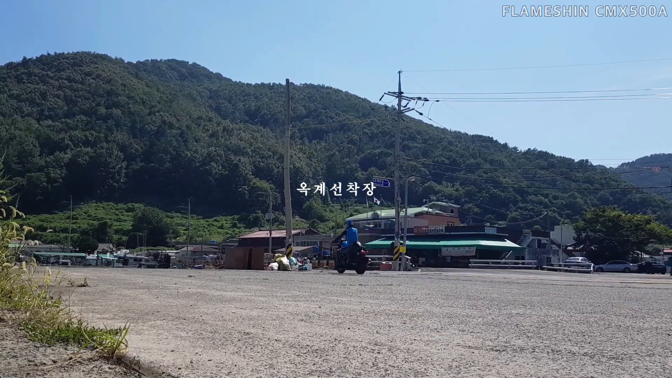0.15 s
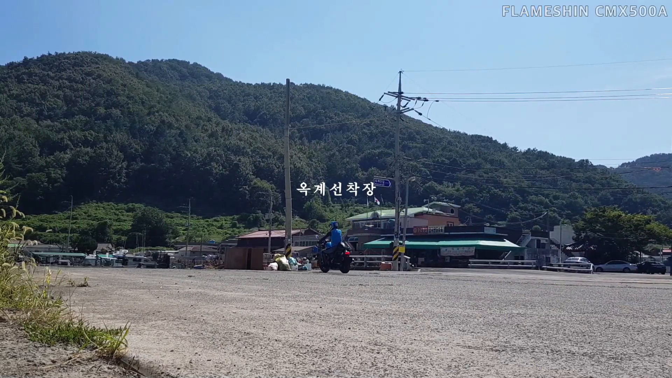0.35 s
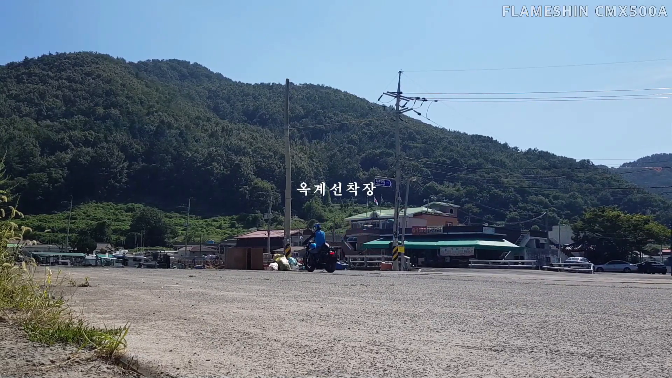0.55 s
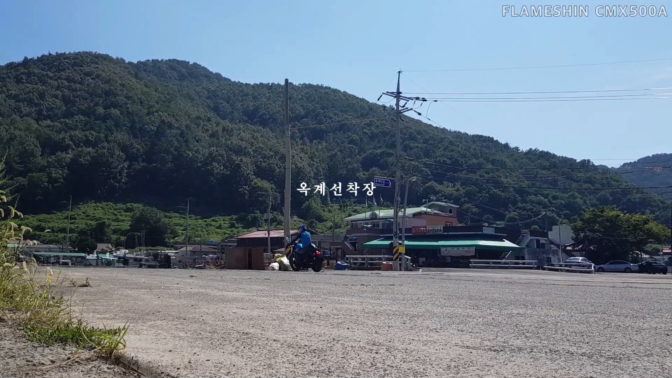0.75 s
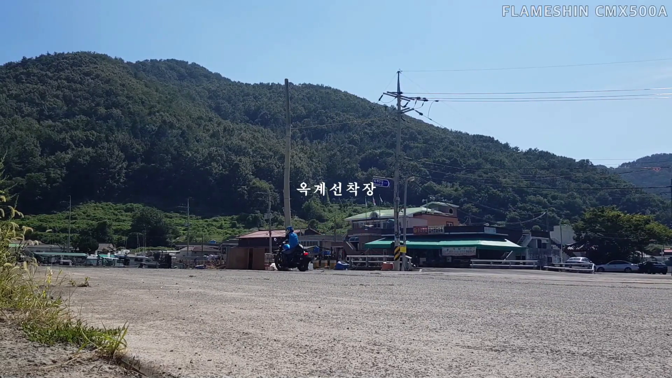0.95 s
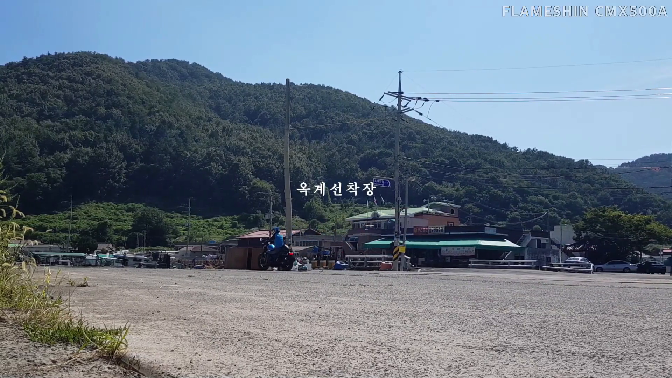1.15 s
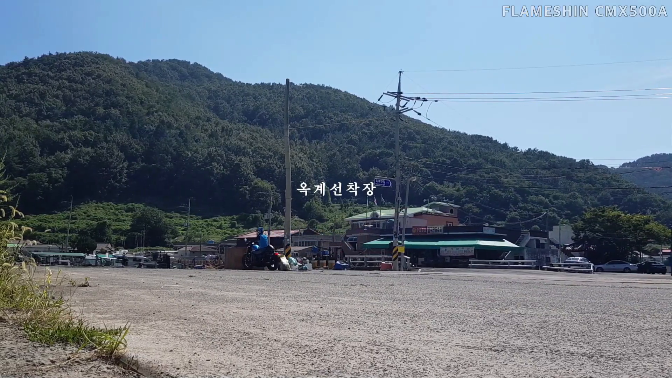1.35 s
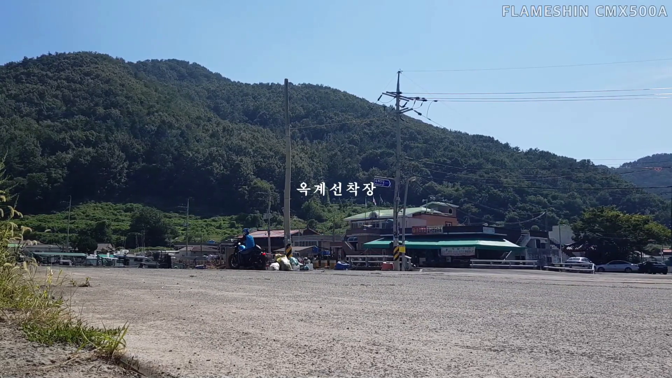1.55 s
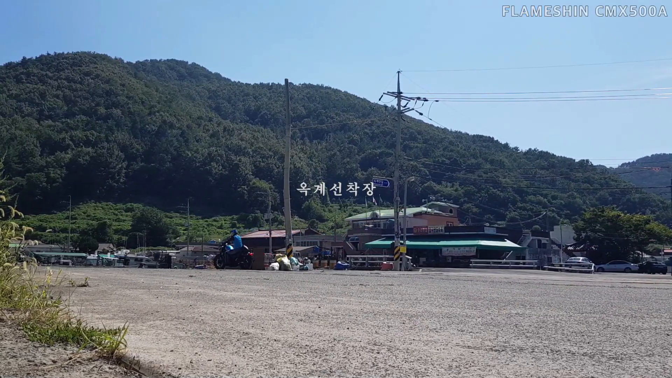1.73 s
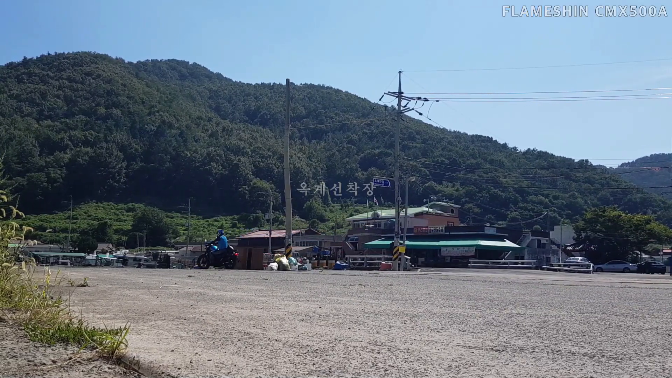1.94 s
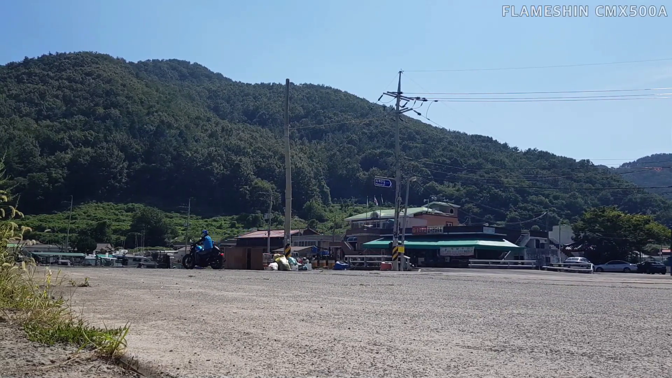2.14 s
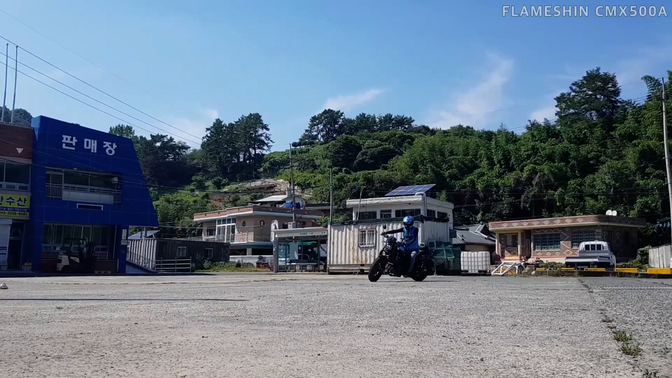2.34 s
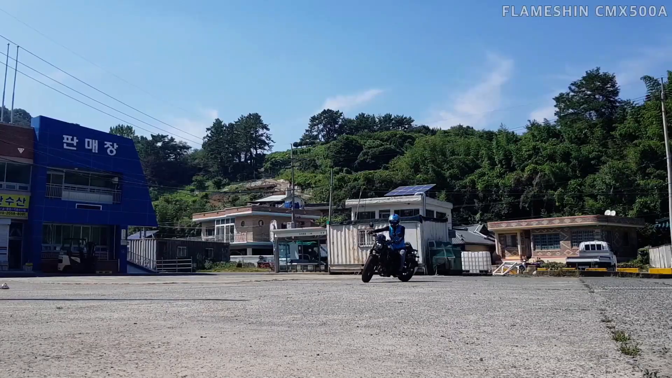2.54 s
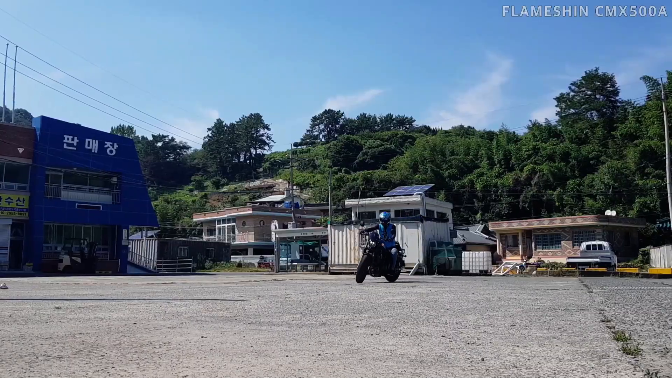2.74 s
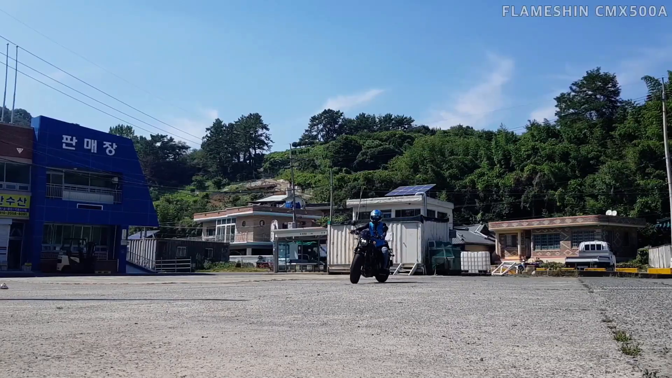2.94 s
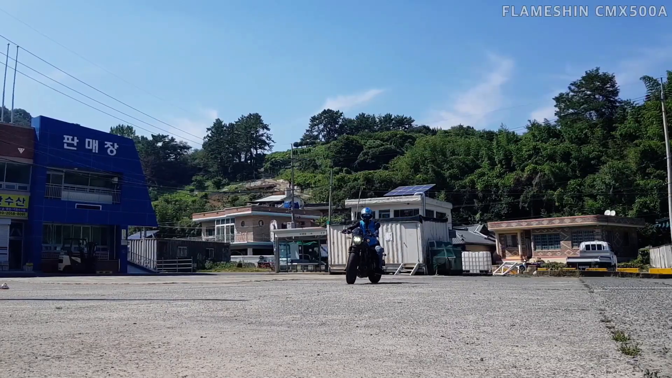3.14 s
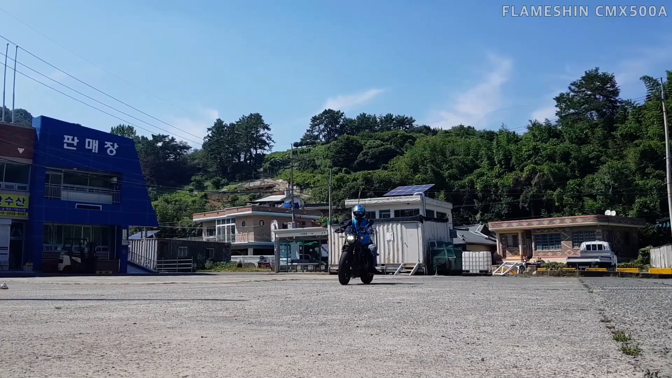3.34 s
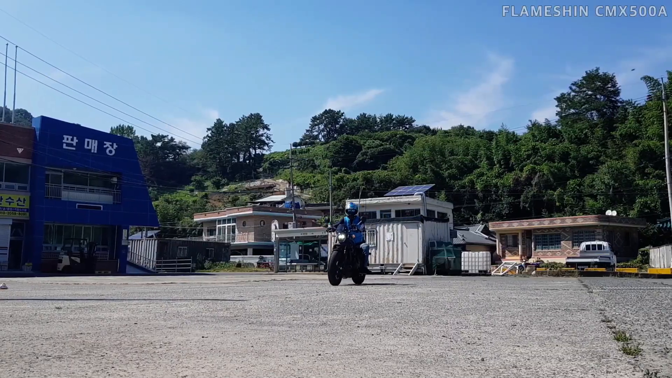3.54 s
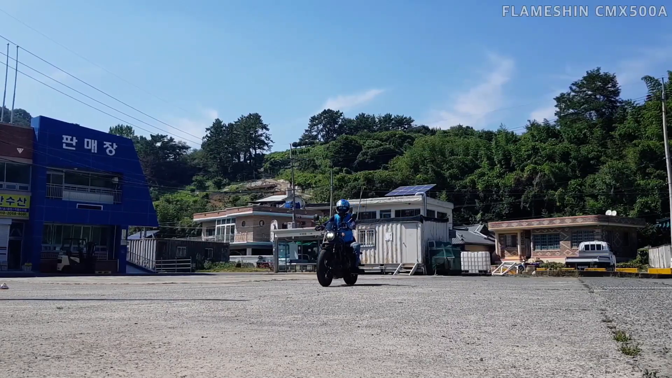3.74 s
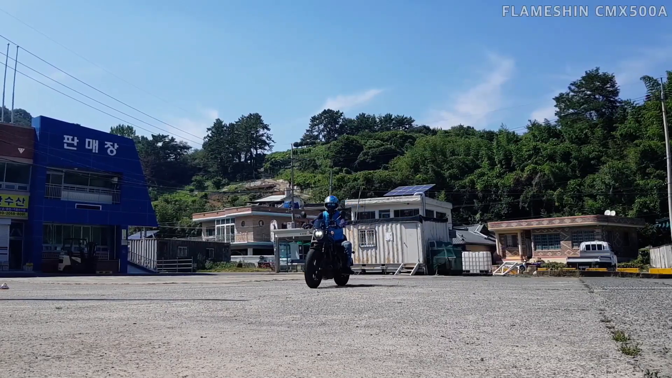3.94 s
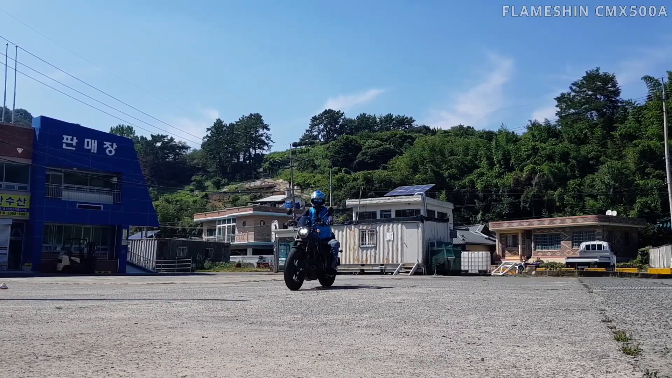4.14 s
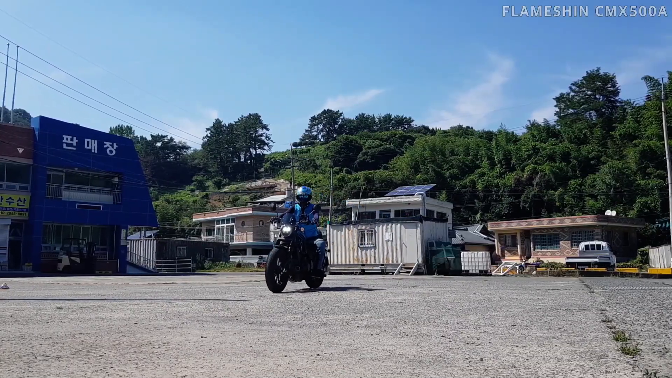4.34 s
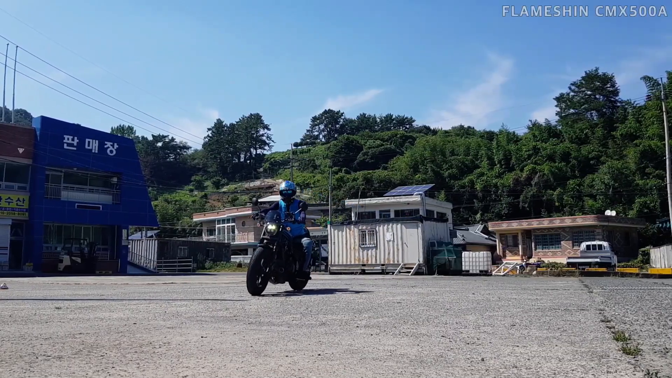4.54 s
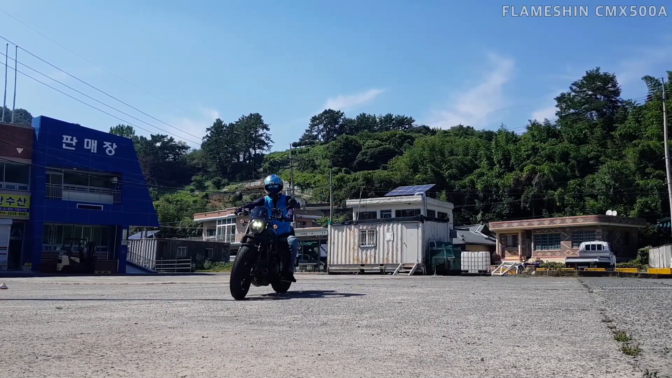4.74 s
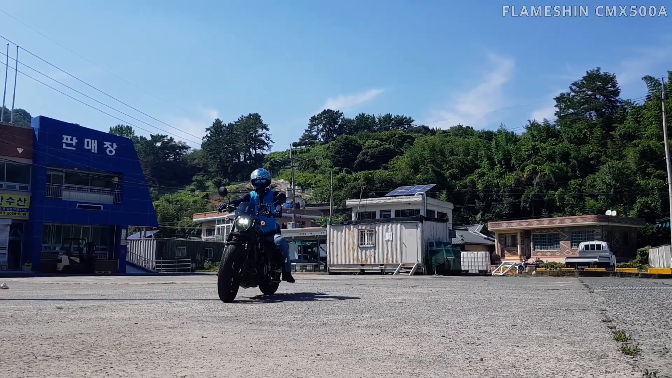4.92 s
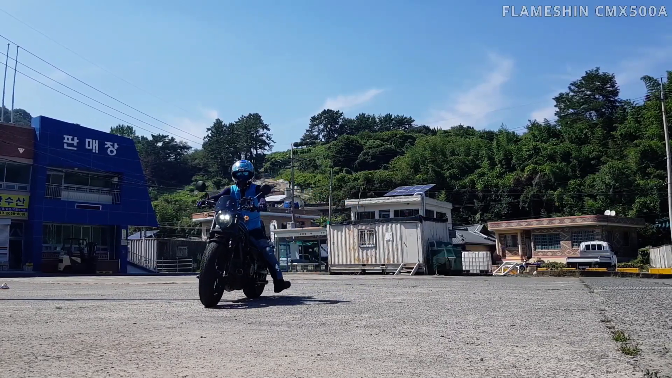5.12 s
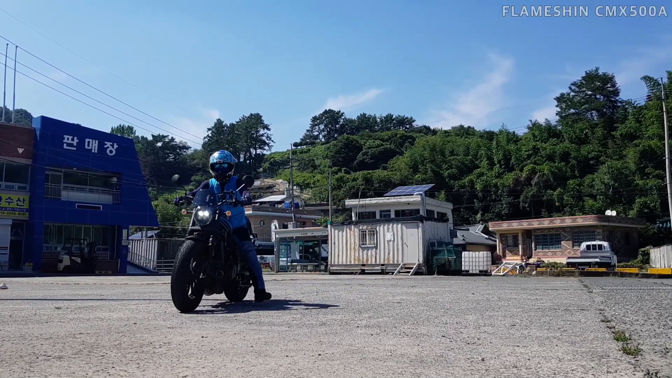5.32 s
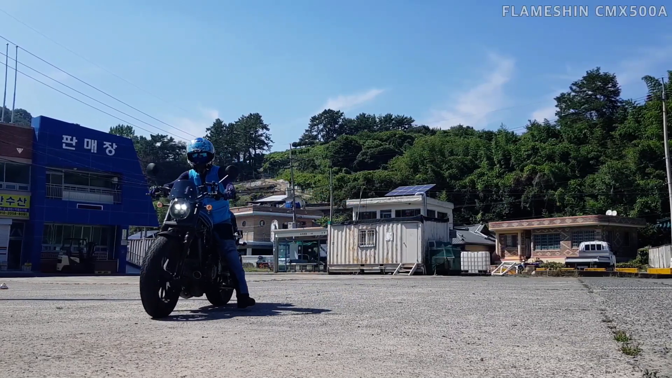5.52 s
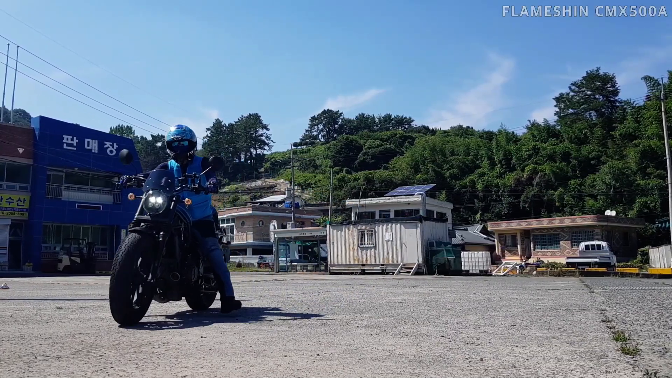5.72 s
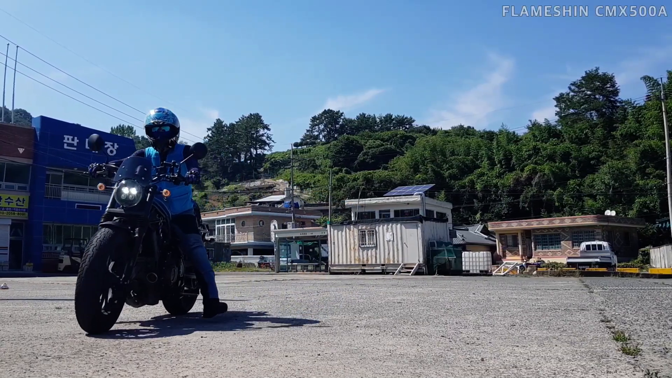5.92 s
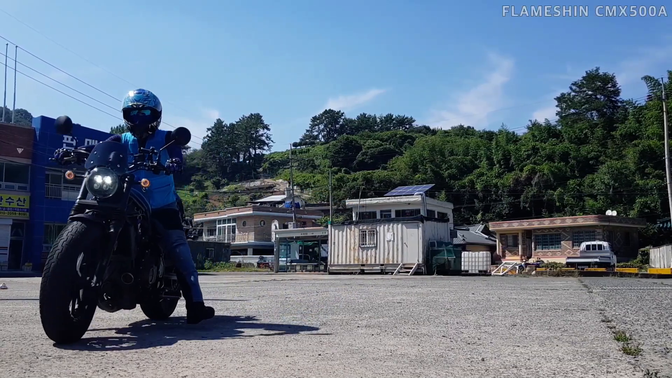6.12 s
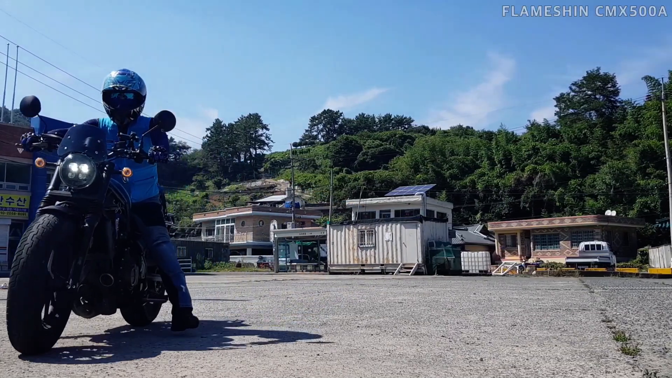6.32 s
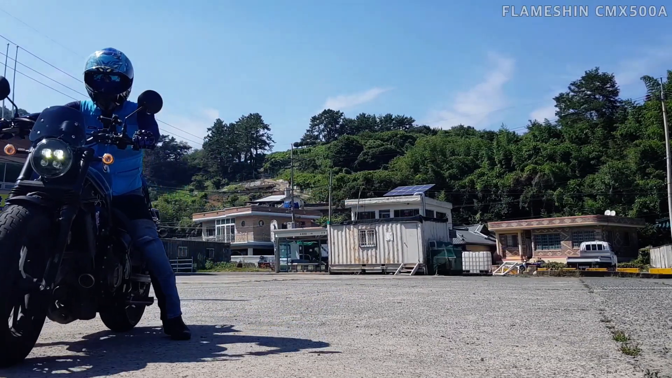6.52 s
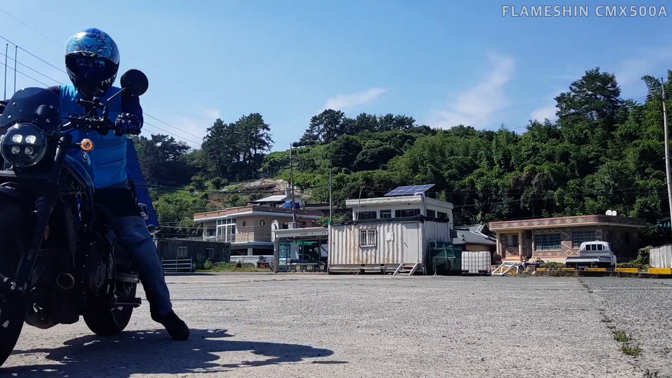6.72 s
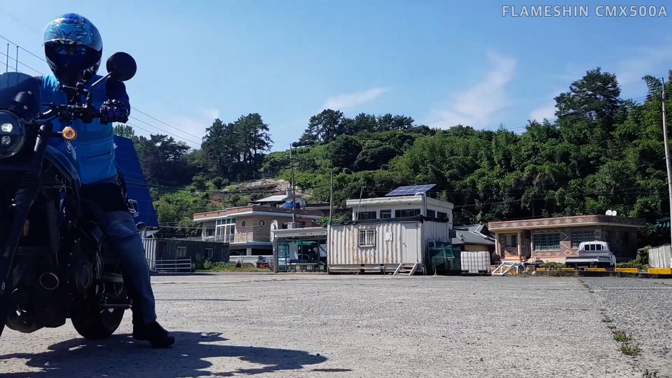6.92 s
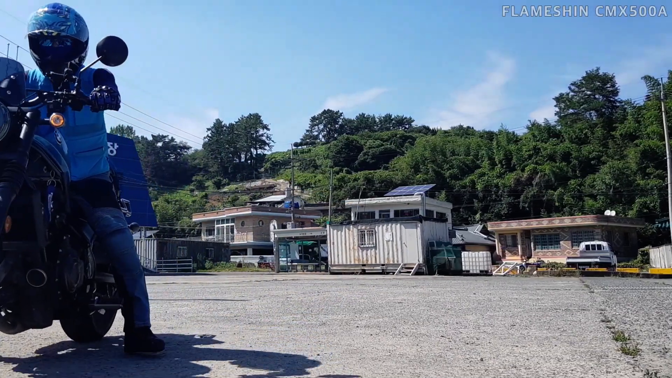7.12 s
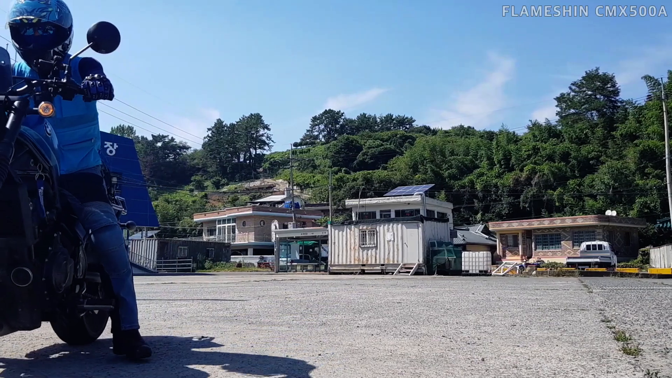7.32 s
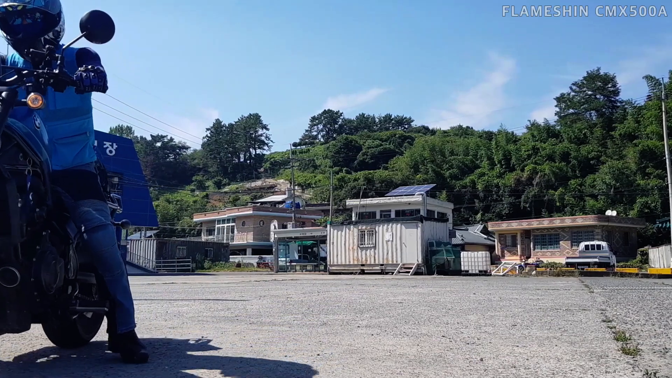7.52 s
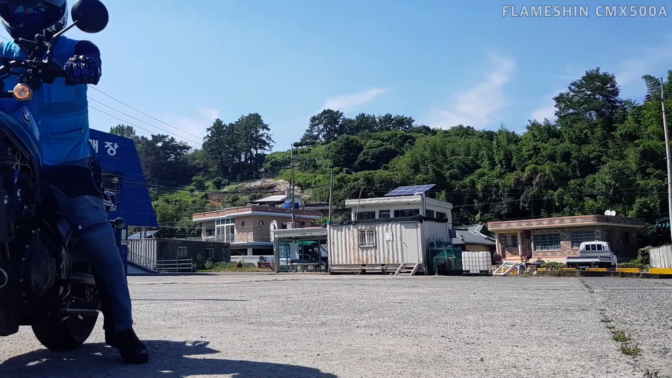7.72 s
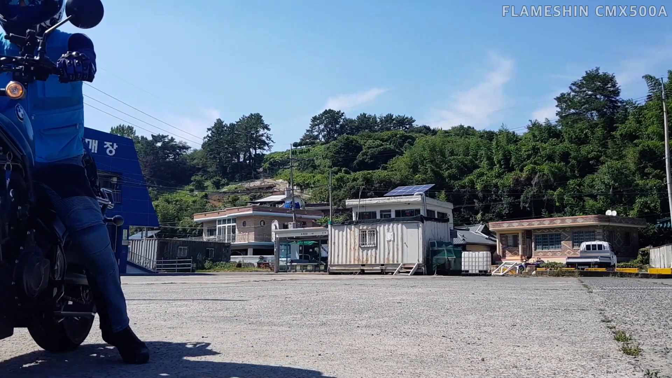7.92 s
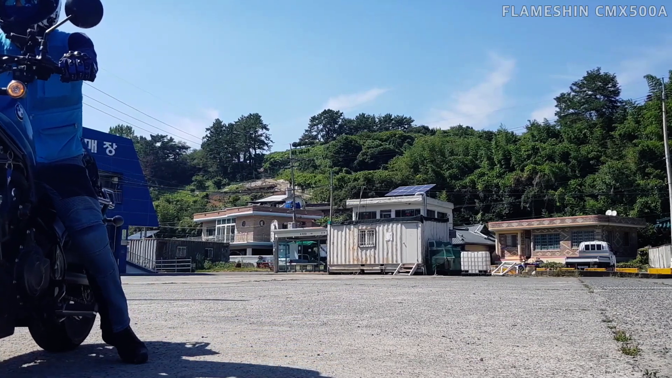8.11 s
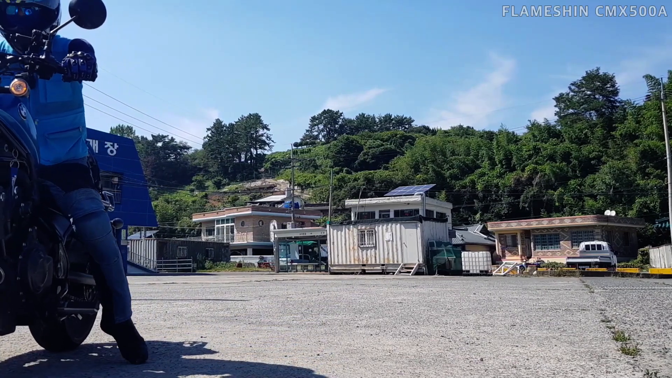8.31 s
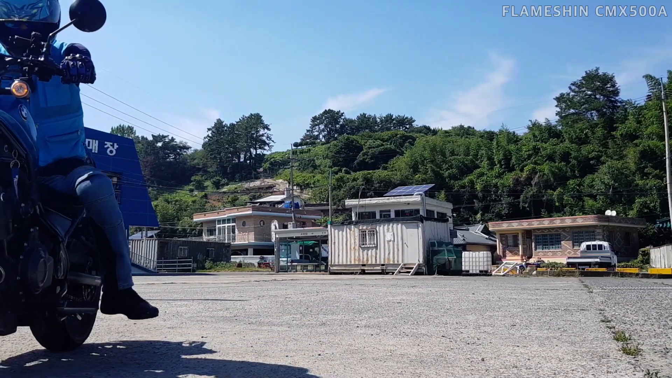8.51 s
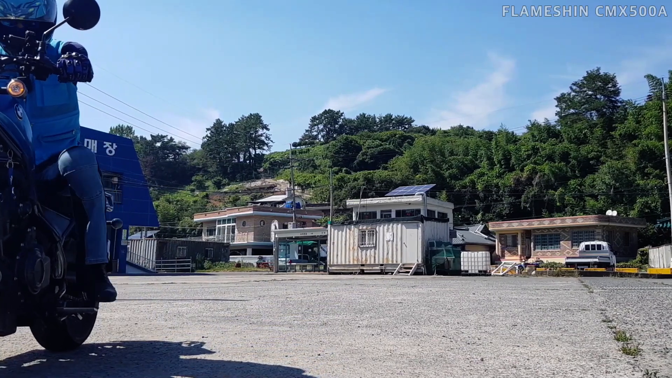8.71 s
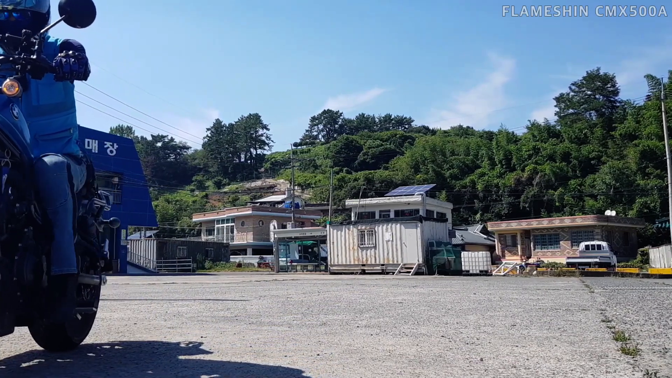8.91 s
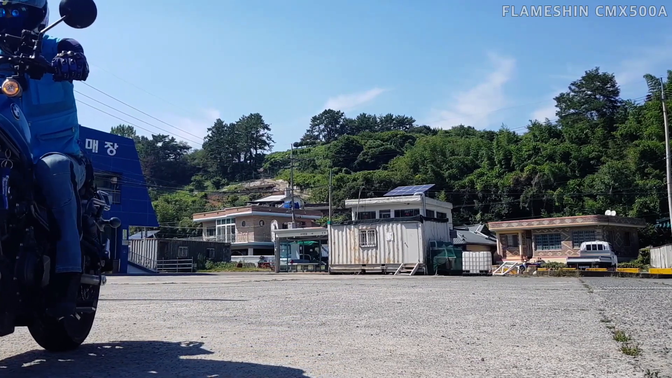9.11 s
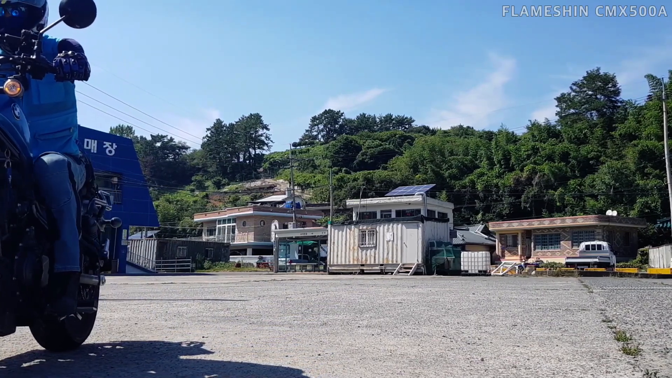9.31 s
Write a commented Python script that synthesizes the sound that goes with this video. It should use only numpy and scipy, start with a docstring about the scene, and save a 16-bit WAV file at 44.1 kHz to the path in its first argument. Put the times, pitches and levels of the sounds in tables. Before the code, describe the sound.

A twin-cylinder motorcycle idles far off, then after a tiny silence approaches with a throttle pull and stops close, idling amid cicadas.

```python
"""A twin-cylinder motorcycle idles far off on a wide concrete lot; after a short silence it is heard nearer,
pulls up under throttle and comes to a halt on the left, still idling. Its cylinders fire in close pairs: soft
puffs ring the exhaust pipe. Shaped noise and short tones make the engine clatter, and even ticks make a pump
buzz. Grit cracks under the tyres, walls answer the exhaust, a far bird whistles and cicadas hiss all around
over far surf and breeze, made from shaped noise."""
import sys
import numpy as np
from scipy import signal
from scipy.fft import rfft, irfft, next_fast_len
from scipy.io import wavfile
from scipy.ndimage import uniform_filter1d, map_coordinates

SR = 44100
rng = np.random.default_rng(int(sys.argv[2]) if len(sys.argv) > 2 else 0)


def to_wav(s):
    """Save 16-bit WAV."""
    ch = np.atleast_2d(s).T  # columns
    pcm = np.round(np.clip(ch, -1, 1) * 32767)  # PCM
    wavfile.write(sys.argv[1], SR, pcm.astype(np.int16))


N = 417186

# Engine speed, a slightly hunting idle far off, then a pull and a hunting idle again:
# t/s, four-stroke cycles per second
ENGINE_SPEED = [(0, 10.105), (.45, 9.717), (.7, 10.216), (.85, 9.861), (1.05, 9.665), (1.45, 10.077),
                (1.6, 9.877), (1.75, 9.983), (2.26, 9.781), (2.2601, 13.583), (2.46, 12.487),
                (2.61, 13.161), (2.86, 12.645), (3.01, 12.672), (3.16, 13.414), (3.41, 14.258),
                (3.76, 15.694), (3.91, 16.039), (4.16, 13.119), (4.36, 11.276), (4.51, 10.332),
                (5.06, 10.142), (5.51, 10.173), (5.81, 9.822), (6.01, 9.945), (6.16, 9.416), (6.36, 9.89),
                (6.61, 9.602), (6.76, 9.711), (7.41, 10.14), (7.96, 9.745), (8.26, 9.95), (8.71, 9.897),
                (9.26, 10.038), (9.6, 9.8)]
# Cycles already done at the start; cycles skipped in the jump from far to near; time of that jump in s
START_CYCLES, SKIPPED_CYCLES, JUMP_S = -.0074, .2708, 2.26
# Throttle: t/s, opening (0-1)
THROTTLE = [(0, 0.12), (3.1, 0.44), (3.4, 1), (3.98, 1), (4.03, 0), (4.4, 0), (5, 0.1), (6, 0), (9.46, 0)]
# Loudness of the bike as it nears: t/s, exhaust level/dB, clatter level/dB
RIDE = [(0.0, -29.5, -54), (0.38, -29.5, -48.5), (1.5, -31.5, -62), (2.25, -26.5, -55.5),
        (2.32, -25.5, -43.5), (2.59, -23, -40), (3.12, -19.5, -41.5), (3.65, -18, -36.5),
        (4.03, -20.5, -36.5), (4.17, -23, -36.5), (4.33, -22.5, -37), (4.5, -21.5, -37.5), (4.8, -19, -36),
        (5.54, -17.5, -35), (6.1, -16.5, -34.5), (6.4, -17.5, -34), (7.4, -16, -33.5), (9.46, -16.5, -34)]

# Cycles whose first firing is weak: t/s, level/dB
WEAK_FIRINGS = [(2.75, -1.5), (4.016, -18), (4.087, -2), (4.24, -4), (4.41, -1.5), (4.6, -5), (5.19, -3.5),
                (7.5, -1.5)]
SECOND_PLACE = 0.2344   # the second cylinder fires about a quarter cycle later
# Second firing beside the first: t/s, level/dB
SECOND_FIRING = [(0, -1.5), (2.25, -4), (2.32, -2), (3.9, 1.5), (4.15, -0.5), (4.4, -2), (9.46, -4.5)]
# A weaker third thump, faint far off, strongest just after the jump nearer, then mostly fading: t/s, level/dB
THIRD_THUMP = [(0, -16), (2.25, -14), (2.32, -3), (3.2, -12), (3.9, -10), (4.15, -10), (4.6, -10),
               (5.5, -16), (9.46, -19)]
THIRD_PLACE = (0.587, 0.4743)   # place in the cycle, 0-1 (far, near)
LATE_JITTER_S = (.006, .001)    # how much the third and fourth thumps wander in time (far, near)
FOURTH_DB = -11.5   # the fourth thump beside the third; it follows as the second follows the first

# Exhaust pipe modes, before the changes below: f/Hz, level/dB, t60/s (time to fall by 60 dB)
PIPE_MODES = [(47, -21.5, .3), (80, -5, .088), (118.6, 0, .128), (167, -3, .16), (318, -6.7, .02)]
PUFF_S, PIPE_LEAD_S = .003, .0087   # softness of a gas puff; head start, as its crest comes late
# The pipe's colour shifts, deeper early on and under full throttle, brighter as the throttle shuts:
# t/s, tilt of the pipe modes (dB per octave)
PIPE_TILT = [(0, -2.5), (2.25, 2), (2.32, 3.5), (3.6, -3.5), (4.3, 6), (5.5, 2), (9.46, 1.2)]
# Share of the ring of all but the deepest mode that dies quickly, largest under load: t/s, share (0-1)
PIPE_DAMPING = [(0, .2), (2.25, .2), (2.32, .45), (3.2, .55), (3.98, .7), (4.4, .3), (5.5, .08),
                (9.46, .08)]
# Low parts of the ring: t/s, deepest mode level/dB added to its own, hollow boom level/dB
PIPE_DEPTH = [(0, -4, -19), (2.25, -1.5, -12), (2.32, -1, -5), (3.1, 0, -7), (3.5, 2, -20), (4.0, 4.5, -20),
              (4.2, 4, -12), (4.8, 1, -24), (9.46, 1, -28)]
BOOM_HZ, BOOM_T60_S, BOOM_LAG_S = 103, 0.12, .002   # the boom speaks a little late
QUICK_T60_SHARE, MUFFLER_HZ = .45, (30, 240)   # t60 of the quick part; band the muffler passes
# Two upper pipe modes growl under throttle; their feeding chamber's width makes them swell after a firing
GROWL_HZ, GROWL_T60_S, GROWL_SWELL_HZ = (194, 264.4), 0.05, 34.4
GROWL_SHUT_DB, GROWL_OPEN_DB, GROWL_UPPER_DB = -12, -1, -4   # shut, full throttle; upper beside lower

# Colour of the clatter noise: f/Hz, level/dB (per Hz, relative)
CLATTER = [(150, -46), (250, -8), (313, -11), (434, -7.5), (525, -11), (593, -11.5), (1070, -14),
           (1700, -21), (2570, -21), (4870, -16.5), (7380, -27), (9070, -26.5), (15500, -31.5)]
# Casing resonances that the clatter rings: f/Hz, width/Hz, level/dB
CASING = [(396.4, 9.5, -10), (440, 18.5, -2.5), (587.4, 11.5, -7.5), (623, 13.5, -5), (728.5, 10.5, -9.5),
          (910, 5, -18), (2004, 710, -8), (3400, 280, -51), (3880, 58, -11.5)]
# Clatter treble beside its body: t/s, level/dB
TREBLE = [(0, -4), (2.25, -11), (2.32, -0.5), (3.8, -3.5), (4.1, -6), (6.7, -5.5), (7.2, -3.5), (9.46, -2)]
REPEATING, REPEAT_HZ = .3, 1300   # amplitude share that repeats every cycle, below this pitch
RASP_DB, RASP_PLACE = 1.8, .41    # the body swells twice a cycle, first at this place (0-1)
# Parts that knock once a cycle: place in the cycle (0-1), f/Hz, level/dB among the knocks, spread/s
KNOCKS = [(.45, 243.2, 8, 0.0063), (.13, 177, 13.5, 0.0047), (0.25, 226, 4, 0.0026), (.42, 429, -1, 0.007),
          (1, 470, -3.5, 0.0024), (.9, 632, -5.5, 0.0029), (.17, 416, -2, 0.0061), (.22, 604, -7, 0.0073),
          (.48, 604, -11, 0.0057), (0.8, 575, -6.5, 0.0036), (1, 500, -11, 0.0022), (1, 830, -9, 0.0013),
          (.18, 840, -10.5, 0.0018), (0.3, 323, -9.5, .004), (.9, 340, -5.5, .004), (.74, 997, -3, 0.0024),
          (0.06, 1130, -7, 0.0019), (.73, 1930, -6.5, 0.0016), (0, 1710, -6, 0.0027)]
# All knocks over the clatter: t/s, level/dB
KNOCK_LEVEL = [(0, -3), (2.25, 1), (2.32, -1), (4, 1), (4.4, -2), (5, 1), (9.46, 2)]

PUMP_HZ = 98.03   # ticks per second
# Pump loudness around which it flickers: t/s, level/dB
PUMP_LEVEL = [(0, -70), (4.5, -58), (6, -48), (7, -43), (9.46, -41.5)]
# Pump resonances: f/Hz, width/Hz, level/dB
PUMP_RESONANCES = [(1665, 70, -1), (2030, 320, -2), (2640, 80, -12), (3255, 60, 7), (4335, 60, -9)]

# Tyres rolling on rough concrete: t/s, level/dB
ROLL_LEVEL = [(2.25, -75), (2.32, -44.5), (3.8, -44), (5.5, -47), (6.2, -67)]
# Tread resonances: f/Hz, width/Hz, level/dB
TREAD = [(967, 36, 7), (1490, 115, -2), (1810, 180, -8), (2200, 250, -5.5)]
# Grit cracking under a tyre: t/s, level/dB, f/Hz, t60/s, sharp edge level/dB, share of the upper ring (0-1)
CRACKS = [(0.284, -38, 2850, .012, -30, .1), (.2858, -37, 3600, .01, -30, .1),
          (0.2868, -21, 400, 0.018, -6, 0.6), (2.6884, -19, 1300, .008, -30, .2),
          (2.6912, -1, 1240, 0.012, -2, 0.67), (4.7045, -10, 1120, 0.014, -30, 0.3),
          (5.285, -21, 1100, 0.012, -4, 0.7), (5.434, -24, 1200, .015, -10, .4),
          (9.291, -22, 910, .02, -20, 0.5)]
# Small dry ticks: t/s, level/dB of the noise before filtering, lowest f/Hz of the band, decay/s
TICKS = [(.264, -34, 700, 0.0046), (0.2834, -31, 700, 0.005), (0.289, -32.5, 400, 0.023),
         (2.6913, -14, 900, 0.0018), (2.6935, -21, 600, 0.0054), (4.672, -33, 300, .008),
         (4.69, -35, 300, .01), (4.705, -26, 250, .012), (4.744, -39, 400, 0.0053),
         (3.132, -39, 6000, .0015), (4.035, -38, 6000, .0015), (4.358, -34, 6000, .0015),
         (4.979, -40, 6000, .0015), (5.049, -40, 6000, .0015), (5.284, -24, 3000, .002),
         (5.449, -29, 6000, .0015), (5.989, -39, 6000, .0015), (8.911, -26, 3000, .003)]

# Bearing of the bike: t/s, delay of left behind right (ms)
BEARING = [(0, .05), (2.25, -.03), (2.32, .07), (4.2, 0), (7.2, -.18), (9.46, -.2)]
YARD_T60_S = 0.54
ECHO_DB = -35.5   # the walls answer at one level wherever the bike is

# Cicada loudness, before a small flicker: t/s, level/dB
CICADA_LEVEL = [(0, -41.5), (1.5, -41), (2, -39.5), (4.5, -41.5), (9.46, -43.5)]
# Colour of the cicadas: f/Hz, level/dB (per Hz, relative)
CICADAS = [(1650, -80), (2800, -27), (3780, -13.5), (4010, -29), (4330, -6), (5330, -13.5), (5940, -7.5),
           (8370, 1), (9800, -5.5), (11900, -29), (15500, -29)]
# A far bird's arching whistle: t/s, f/Hz, level/dB before flicker
BIRD = [(0, 4130, -64), (.05, 4500, -59), (.07, 4770, -59), (.11, 4800, -59), (.16, 4620, -59),
        (.2, 4230, -52), (.225, 4400, -62), (.25, 4600, -80)]
# Loudness of far surf and breeze, before a slow drift: t/s, level/dB
AMBIENCE_LEVEL = [(0, -39.5), (1, -39.5), (2, -40), (2.32, -39.5), (3.2, -37), (4, -48), (9.46, -37.5)]
# Colour of far surf and breeze: f/Hz, level/dB (per Hz, relative)
AMBIENCE = [(15, -40), (25, -14), (45, -12), (123, -13.5), (188, -8.5), (264, -16), (489, -26),
            (831, -26.5), (2300, -45.5), (4000, -36), (5200, -73), (8800, -120)]
# How alike left and right are in sound from all around: f/Hz, likeness (-1 to 1)
LIKENESS = [(60, 0.96), (130, 1), (290, 0.91), (640, 0.78), (1410, 0.21), (3100, 0.19), (6820, -0.22),
            (15000, 0.27)]

SILENCE = (2.259, 2.314)    # from, to in s
SHADE = (4300, 2500, -13)   # part the housing takes from the left port: f/Hz, width/Hz, level/dB
CUTOFF_HZ = 15700


def exhaust():
    """Two firings per cycle send soft gas puffs into the ringing pipe; two weaker thumps follow and ring it the
    same way."""
    puffs = gas_puffs()
    pipe = pipe_ring(puffs) + growl(puffs)
    # even out the slow level, which the ride table sets
    power = uniform_filter1d(uniform_filter1d(pipe ** 2, size=13000), size=13000)
    return pipe / np.sqrt(power)


def gas_puffs():
    """Each firing releases a soft pulse of gas, with chance in its strength and timing."""
    s, turns = crank()
    start = np.interp(np.arange(int(turns[-1])), turns, s)
    first_db = np.zeros(len(start))
    for weak_s, weak_db in WEAK_FIRINGS:
        first_db[np.argmin(abs(start - weak_s))] = weak_db
    second_db = np.interp(start, *np.transpose(SECOND_FIRING))
    third_db = np.interp(start, *np.transpose(THIRD_THUMP))
    levels_db = np.array([first_db, second_db, third_db, third_db + FOURTH_DB])
    chance = rng.standard_normal((5, len(start)))
    levels_db = levels_db + [[.5], [.6], [2], [2]] * chance[:4]
    # a strong first firing tends to leave a weaker second one
    levels_db = levels_db + [[.7], [-.6], [0], [0]] * chance[4]
    zero, third = 0 * start, by_view(THIRD_PLACE, start)
    places = np.array([zero, zero + SECOND_PLACE, third, third + SECOND_PLACE])
    wander_s = by_view(LATE_JITTER_S, start)
    jitter_s = np.array([zero + .0004, zero + .0004, wander_s, wander_s])
    clicks = once_a_cycle(places, levels_db, jitter_s, PIPE_LEAD_S)
    r = np.exp(-1 / (PUFF_S * SR))
    return signal.lfilter([1], [1, -2 * r, r * r], clicks)


def pipe_ring(puffs):
    """The gas column rings at several pitches at once; the muffler passes only the low band."""
    tilt_db = in_time(PIPE_TILT)[0]
    damped = np.clip(in_time(PIPE_DAMPING)[0], 0, 1)
    deep_db, boom_db = in_time(PIPE_DEPTH)
    pipe = 0
    for k, (hz, level_db, t60) in enumerate(PIPE_MODES):
        octaves = np.log2(hz / PIPE_MODES[2][0])
        gain = amp(level_db + tilt_db * octaves + (0 if k else deep_db))
        quick_t60 = (QUICK_T60_SHARE if k else 1) * t60
        slow = without_lead_in(ring(puffs, hz, t60))
        quick = without_lead_in(ring(puffs, hz, quick_t60))
        mode = (1 - damped) * slow + damped * quick
        pipe = pipe - (-1) ** k * gain * mode   # neighbouring modes have opposite sense
    late_puffs = np.roll(puffs, round(BOOM_LAG_S * SR))
    pipe = pipe - amp(boom_db) * without_lead_in(ring(late_puffs, BOOM_HZ, BOOM_T60_S))
    muffler = signal.butter(2, MUFFLER_HZ, "band", fs=SR, output="sos")
    return signal.sosfiltfilt(muffler, pipe)


def growl(puffs):
    """Two upper pipe modes, fed through a chamber, grow louder as the throttle opens."""
    low, high = (without_lead_in(ring(resonances(puffs, [(hz, GROWL_SWELL_HZ, 0)]), hz, GROWL_T60_S))
                 for hz in GROWL_HZ)
    level_db = GROWL_SHUT_DB + (GROWL_OPEN_DB - GROWL_SHUT_DB) * in_time(THROTTLE)[0]
    return amp(level_db) * (low - amp(GROWL_UPPER_DB) * high)


def crank():
    """Times in s and engine cycles done: the speed summed up."""
    s = np.arange(0, ENGINE_SPEED[-1][0], 1 / SR)
    speed = np.interp(s, *np.transpose(ENGINE_SPEED))
    return s, START_CYCLES + np.cumsum(speed) / SR + SKIPPED_CYCLES * (s > JUMP_S)


def once_a_cycle(places, levels_db, jitter_s, lead_s):
    """A click at each place of every cycle; the train starts a tenth of a second early."""
    s, turns = crank()
    cycle = np.arange(int(turns[-1]))
    times = np.interp(cycle + places, turns, s) - lead_s
    times = times + jitter_s * rng.standard_normal(np.shape(levels_db))
    clicks = np.zeros(N + SR // 2)
    np.add.at(clicks, np.round(times * SR).astype(int) + SR // 10, amp(levels_db))
    return clicks


def clatter(treble_db):
    """Valve gear and gas rush: dense noise grains, partly the same each cycle, ring the casing."""
    turns = crank()[1][:N]
    fresh = rng.standard_normal(N)
    pattern = rng.standard_normal(SR // 10)
    repeated = pattern[(turns % 1 * len(pattern)).astype(int)]
    # swap part of the low noise for the repeated pattern, at the same power
    swap = REPEATING * repeated + (np.sqrt(1 - REPEATING ** 2) - 1) * fresh
    grains = fresh + signal.sosfiltfilt(signal.butter(2, REPEAT_HZ, fs=SR, output="sos"), swap)
    grains = grains * amp(1.1 * drift(60) + .5 * drift(8))
    noise = coloured(grains + 3.47 * resonances(grains, CASING), CLATTER)
    body = signal.sosfilt(signal.butter(2, 2600, fs=SR, output="sos"), noise)
    treble = noise - body
    rasp = amp(RASP_DB * np.cos(4 * np.pi * (turns - RASP_PLACE)))
    return (rasp * body + amp(treble_db) * treble) / np.std(body)


def knocks():
    """Engine parts ring in short swelling tones tied to the crank, with a new strength every cycle."""
    out, age = 0, np.arange(-1500, 1501) / SR
    cycles = int(crank()[1][-1])
    for place, hz, level_db, spread_s in KNOCKS:
        strengths_db = level_db + 2.27 * rng.standard_normal(cycles)
        burst = np.exp(-.5 * (age / spread_s) ** 2) * np.cos(2 * np.pi * hz * age)
        clicks = once_a_cycle(place, strengths_db, 0.001013, 0)
        out = out + signal.oaconvolve(clicks, burst, "same")
    return without_lead_in(out)


def scattered_clatter(clatter_db, treble_db):
    """Clatter noise arriving from all around, following the direct clatter's level."""
    return amp(clatter_db + treble_db / 2 - 2.5) * diffuse(CLATTER)


def pump():
    """An electric pump ticks evenly into a few small resonances: a comb of thin lines."""
    ticks = np.diff(np.floor(PUMP_HZ * np.arange(N + 1) / SR))
    level_db = in_time(PUMP_LEVEL)[0] + 2.2 * drift(6)
    return amp(level_db) * rms_one(resonances(ticks, PUMP_RESONANCES))


def tyres():
    """Fine grit under the tread: lumpy noise in a few resonances."""
    grains = rng.standard_normal(N) * amp(3.1 * drift(38))
    return amp(in_time(ROLL_LEVEL)[0]) * rms_one(resonances(grains, TREAD))


def grit():
    """Cracks ring briefly near their own pitch with a sharp edge; ticks are short puffs of noise."""
    out, age = np.zeros(N), np.arange(1500) / SR
    for s, level_db, hz, t60, edge_db, upper in CRACKS:
        click = amp(level_db) * (age == 0)
        snap = ring(click, hz, t60)
        snap = snap - 0.29 * ring(click, 0.62 * hz, 1.7 * t60)
        snap = snap + 0.13 * ring(click, 0.375 * hz, 2.2 * t60)
        snap = snap - upper * ring(click, 1.67 * hz, 0.19 * t60)
        edge = np.diff(ring(click, 2.1 * hz, 0.12 * t60), prepend=0)
        at = round(s * SR)
        out[at:at + len(age)] += snap + amp(edge_db) * edge
    for s, level_db, low_hz, decay_s in TICKS:
        band_hz = [low_hz, min(8 * low_hz, .45 * SR)]   # three octaves at most
        band = signal.butter(2, band_hz, "band", fs=SR, output="sos")
        puff = signal.sosfilt(band, rng.standard_normal(len(age))) * np.exp(-age / decay_s)
        at = round(s * SR)
        out[at:at + len(age)] += amp(level_db) * puff
    return out


def placed(x):
    """Two spaced microphone ports: the sound arrives a little earlier at the nearer one."""
    index = np.arange(N)
    half = in_time(BEARING)[0] * SR / 2000   # half the delay, in samples
    return np.array([map_coordinates(x, [index - side * half], order=3) for side in (1, -1)])


def walls(x):
    """Many late echoes off the buildings round the lot, nearly alike at both ports."""
    age = np.arange(SR // 2) / SR
    fade = amp(-60 * age / YARD_T60_S) * (age > .025)
    mid, side = rng.standard_normal((2, len(age))) * fade
    echoes = [signal.oaconvolve(x, mid + way * 0.11 * side)[:N] for way in (1, -1)]
    return rms_one(np.array(echoes)) * np.std(x)


def cicadas():
    """Many insects merge into a wide, faintly flickering hiss, slightly louder on the right."""
    level_db = in_time(CICADA_LEVEL)[0] + .8 * drift(8)
    return amp(level_db) * diffuse(CICADAS) * amp([[-.4], [.4]])


def bird():
    """A far whistle: a near sine, broken by the air it crosses."""
    hz, level_db = in_time(BIRD)
    tone = np.sin(2 * np.pi * np.cumsum(hz) / SR)
    return amp(level_db + 2.2 * drift(25)) * tone * (np.arange(N) < BIRD[-1][0] * SR)


def ambience():
    """Far surf and breeze: wide, mostly low noise whose level drifts slowly."""
    return amp(in_time(AMBIENCE_LEVEL)[0] + .8 * drift(1)) * diffuse(AMBIENCE)


def amp(db):
    """Turn dB into a gain."""
    return 10 ** (np.asarray(db) / 20)


def rms_one(x):
    """Scale to rms (average strength) 1."""
    return x / np.sqrt(np.mean(x ** 2) + 1e-20)


def in_time(rows):
    """Columns of a table over time, one value per sample."""
    s, *columns = np.transpose(rows)
    return [np.interp(np.arange(N) / SR, s, c) for c in columns]


def by_view(pair, s):
    """First value while the bike is far, second after the jump nearer."""
    return np.where(s < JUMP_S, *pair)


def without_lead_in(x):
    """Drop the tenth of a second by which the click trains start early."""
    return x[SR // 10:SR // 10 + N]


def at_hz(points, hz):
    """Read a spectrum on a log-frequency axis."""
    f, value = np.transpose(points)
    return np.interp(np.log(hz), np.log(f), value)


def coloured(x, spectrum):
    """Give a white signal a spectrum; rms 1."""
    size = next_fast_len(N)
    hz = np.maximum(np.fft.rfftfreq(size, 1 / SR), 1)
    return rms_one(irfft(rfft(x, size) * amp(at_hz(spectrum, hz)), size)[..., :N])


def diffuse(spectrum):
    """Stereo noise from all around: left and right are alike by an amount set for each frequency."""
    size = next_fast_len(N)
    hz = np.maximum(np.fft.rfftfreq(size, 1 / SR), 1)
    mid, side = rfft(rng.standard_normal((2, size))) * amp(at_hz(spectrum, hz))
    alike = np.clip(at_hz(LIKENESS, hz), -1, 1)
    pair = np.sqrt(1 + alike) * mid + np.sqrt(1 - alike) * side * [[1], [-1]]
    return rms_one(irfft(pair, size)[:, :N])


def drift(rate):
    """Smoothed chance with rms 1; a higher rate (Hz) wanders faster."""
    r = np.exp(-80 * np.pi * rate / SR)   # one step is 40 samples
    chance = rng.standard_normal(N // 40 + 2002)
    slow = signal.lfilter([1], [1, -2 * r, r * r], chance)[2000:]   # skip the settling
    return np.interp(np.arange(N) / 40, np.arange(len(slow)), rms_one(slow))


def ring(x, hz, t60):
    """A unit click sets a sine of starting height 1 ringing; it falls by 60 dB in t60 seconds."""
    r, w = amp(-60 / (t60 * SR)), 2 * np.pi * hz / SR
    return signal.lfilter([0, np.sin(w)], [1, -2 * r * np.cos(w), r * r], x + 1e-18)


def resonances(x, peaks):
    """Parallel resonances, signs alternating."""
    out = 0
    for k, (hz, width, level_db) in enumerate(peaks):
        r = np.exp(-np.pi * width / SR)
        pole = [1, -2 * r * np.cos(2 * np.pi * hz / SR), r * r]
        peak = signal.lfilter([(1 - r * r) / 2, 0, (r * r - 1) / 2], pole, x)
        out = out + (-1) ** k * amp(level_db) * peak
    return out


def scene():
    """The bike at its bearing, echoes off the walls, cicadas, a bird and far noise."""
    exhaust_db, clatter_db = in_time(RIDE)
    treble_db = in_time(TREBLE)[0]
    pipe = exhaust()
    mechanics = clatter(treble_db) + amp(in_time(KNOCK_LEVEL)[0]) * knocks()
    engine = amp(exhaust_db) * pipe + amp(clatter_db) * mechanics
    bike = engine + pump() + tyres() + grit()
    around_bike = scattered_clatter(clatter_db, treble_db) + amp(ECHO_DB) * walls(pipe)
    background = cicadas() + bird() + ambience()
    return placed(bike) + around_bike + background


def record(dry):
    """The left port is shaded, the deepest bass drops, a short silence parts far from near, the top is cut."""
    t = np.arange(N) / SR
    outside_s = np.maximum(SILENCE[0] - t, t - SILENCE[1])   # negative inside the silence
    gate = np.clip(outside_s / 0.0058 + 1, 0, 1) ** 3
    shaded = np.array([dry[0] - resonances(dry[0], [SHADE]), dry[1]])
    heard = signal.sosfilt(signal.butter(1, 12, "high", fs=SR, output="sos"), shaded) * gate
    return signal.sosfilt(signal.ellip(12, .3, 80, CUTOFF_HZ, fs=SR, output="sos"), heard)


dry = scene()
out = record(dry)
to_wav(out)
```